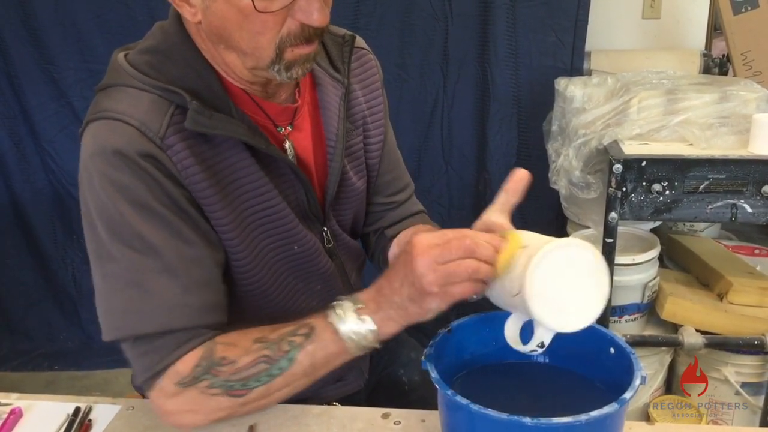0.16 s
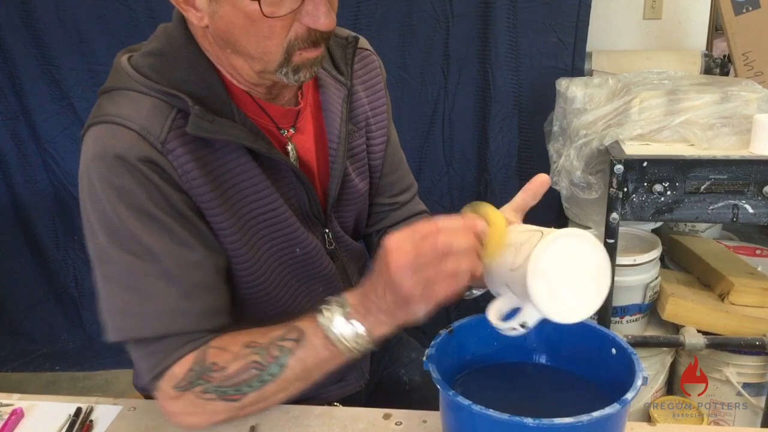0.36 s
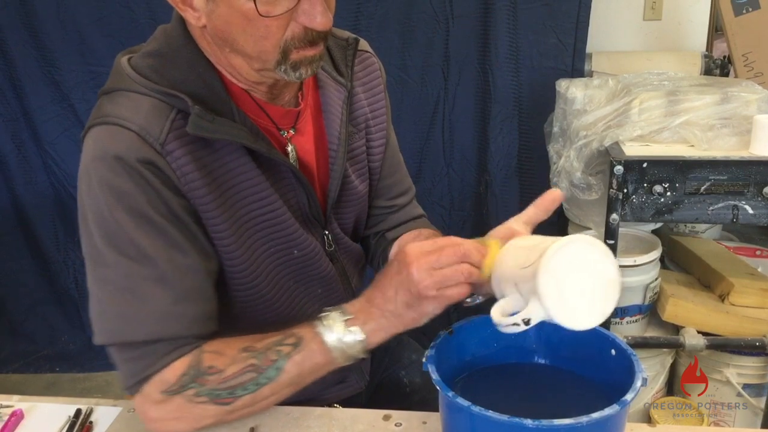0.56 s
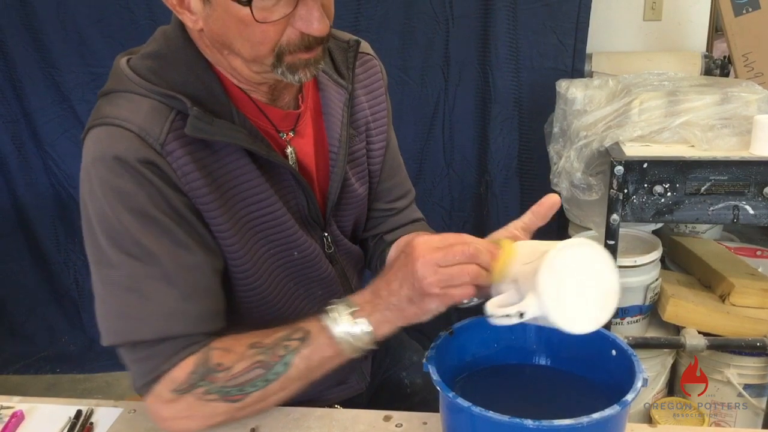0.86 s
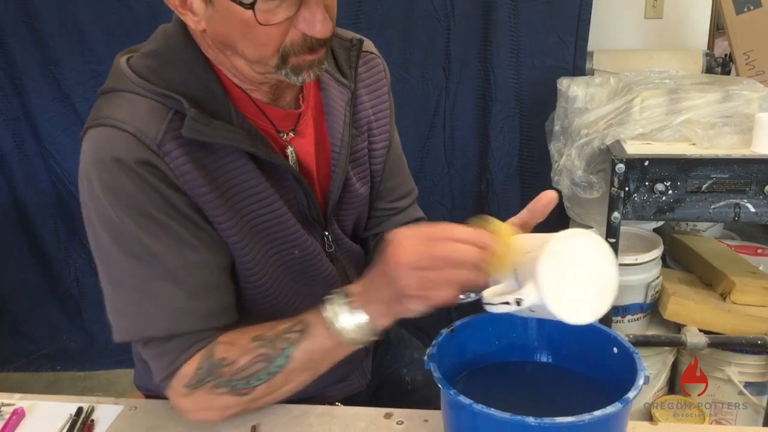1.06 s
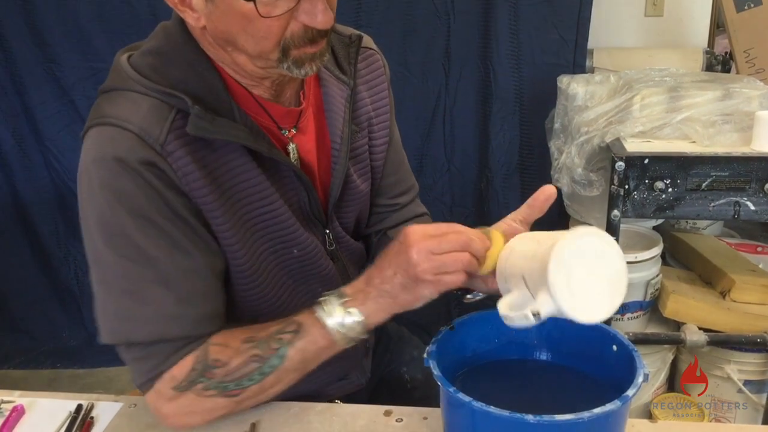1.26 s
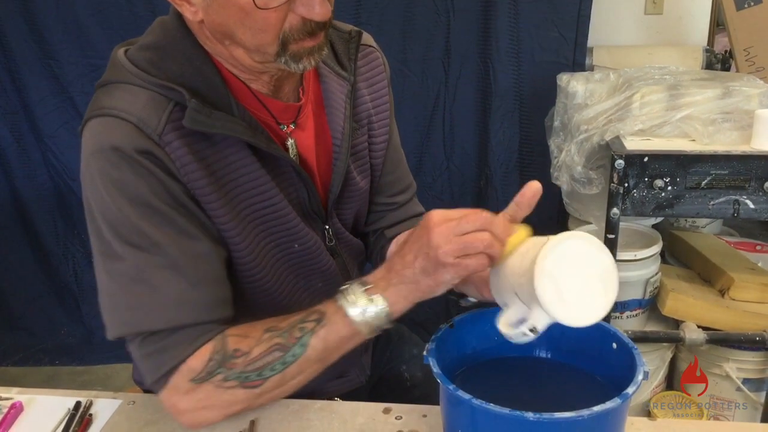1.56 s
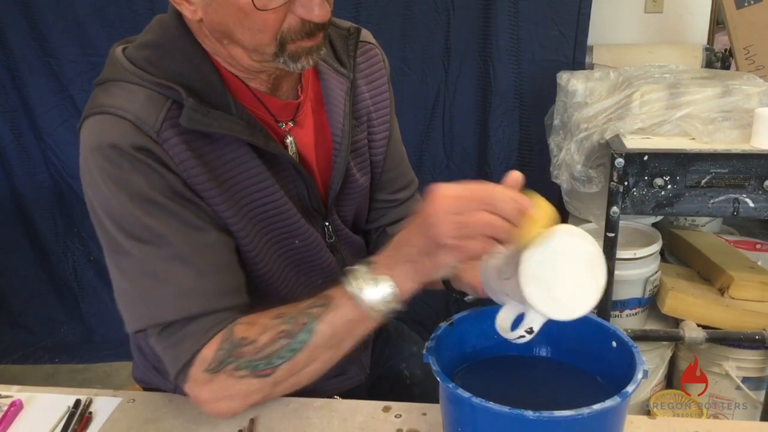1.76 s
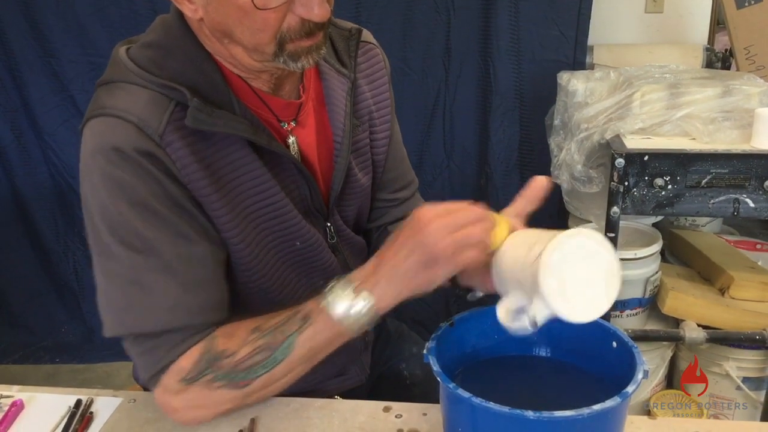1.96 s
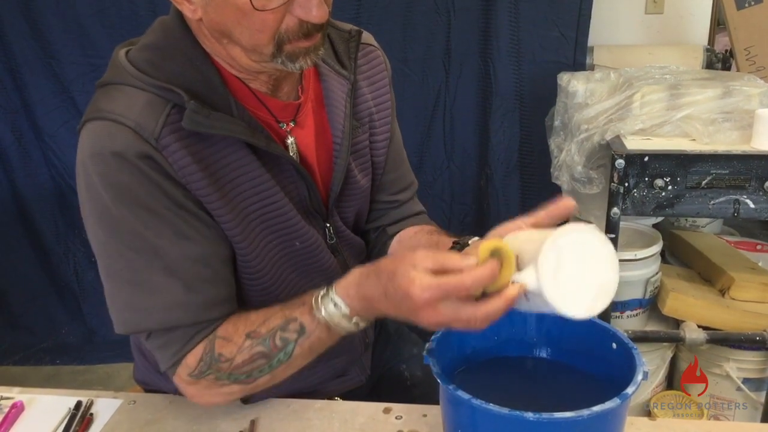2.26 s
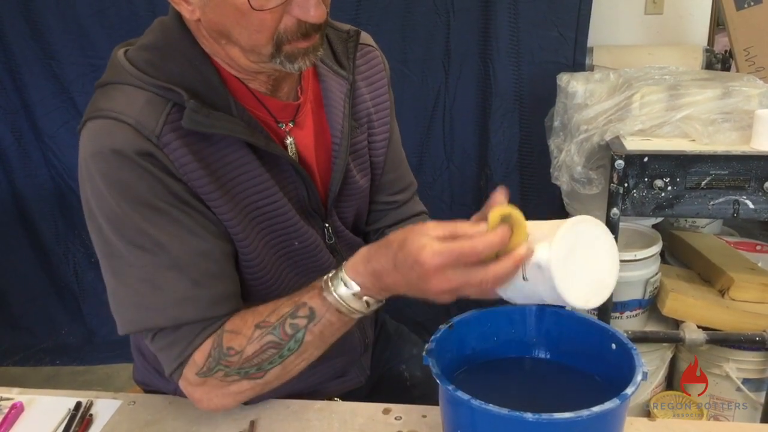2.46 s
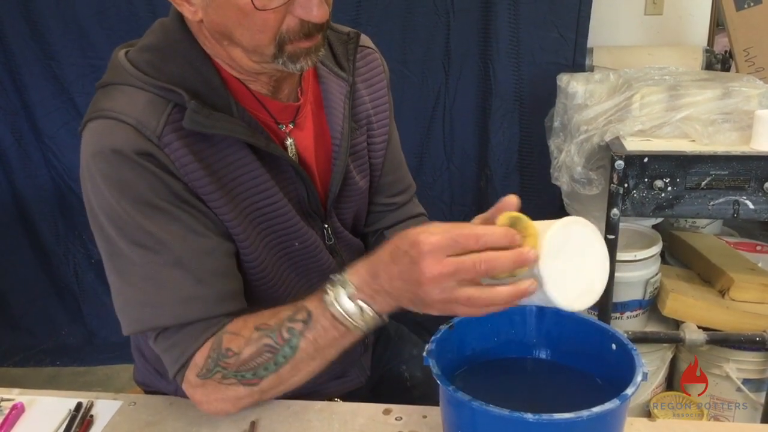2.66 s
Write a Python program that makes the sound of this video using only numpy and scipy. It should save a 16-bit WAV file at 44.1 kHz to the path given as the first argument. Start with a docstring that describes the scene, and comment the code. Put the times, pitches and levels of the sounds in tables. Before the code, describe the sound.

A damp sponge wipes a ceramic mug close to the microphone: six quick, bright, fizzing strokes with small wet ticks, then a longer squeaky rub and a light one, in a quiet small room with low hum.

```python
"""Damp sponge on a ceramic mug

A damp sponge is wiped over a bare mug in a quiet studio, heard close: six quick strokes, a longer and a light one.
Its pores catch and slip as a dense bright fizz that also rings the mug; wet ticks mark touch-downs.
Single mug notes, a thin squeak and soft low plops come through; faint sparse reflections follow.
A low room rumble with hiss and mains hum lies underneath."""
import sys
import numpy as np
from scipy import signal
from scipy.io import wavfile
from scipy.ndimage import uniform_filter1d

SR = 44100
rng = np.random.default_rng(int(sys.argv[2]) if len(sys.argv) > 2 else 0)


def int16_out(signal):
    """Quantize to a 16-bit WAV file."""
    q = np.round(np.clip(np.atleast_2d(signal).T, -1, 1) * 32767)
    wavfile.write(sys.argv[1], SR, q.astype(np.int16))


N = 123479  # length [samples]


def amp(db):
    """Decibels to a linear factor."""
    return 10 ** (np.asarray(db) / 20)


def evened(x):
    """Scale to an rms of one."""
    return x / np.sqrt(np.mean(x ** 2) + 1e-20)


def drift(seconds):
    """Slow random wander: twice-smoothed noise with an rms of one."""
    steps = rng.standard_normal(N // 128 + 2)  # one step per 128 samples
    size = int(seconds * SR / 128) + 1
    smooth = evened(uniform_filter1d(uniform_filter1d(steps, size), size))
    return np.interp(np.arange(N) / 128, np.arange(len(steps)), smooth)


def colour(x, points):
    """Causal minimum-phase filter with the given spectrum shape; white input keeps its power."""
    f, db = np.transpose(points)
    hz = abs(np.fft.fftfreq(4096, 1 / SR))
    log_gain = np.log(amp(np.interp(np.log(hz + 1), np.log(f + 1), db)))
    spectrum = np.exp(np.conj(signal.hilbert(log_gain)))
    taps = np.fft.ifft(spectrum).real[:2048]
    return signal.oaconvolve(x, taps / np.linalg.norm(taps))[:len(x)]


def mode(x, hz, width):
    """One damped resonance; white input keeps its power."""
    r = np.exp(-np.pi * width / SR)
    ringing = signal.lfilter([1], [1, -r * np.exp(2j * np.pi * hz / SR)], x)
    return 2 * np.sqrt(1 - r) * ringing.imag


def steep(x, hz, width):
    """The same resonance twice, for dark valleys between modes."""
    return mode(mode(x, hz, width), hz, width) * np.sqrt(2 * np.pi * width / SR)


# Spectrum of the studio air: (frequency [Hz], relative level [dB per Hz])
AIR_SPECTRUM = [(15, -42), (30, -30), (50, 2), (80, 0.5), (300, -6), (500, -13.5), (900, -18.5),
                (2000, -21), (4000, -23.5), (7500, -29.5), (9000, -24), (13500, -25.5), (14500, -51),
                (15700, -58)]
# Mains hum tones: (pitch [Hz], level before the common lift [dB])
HUM_TONES = [(120, -77), (240, -81.5), (480, -85), (1080, -90.5), (1920, -86)]
AIR_DB = -67  # rms before the rumble wanders
RUMBLE_DRIFT_DB, RUMBLE_DRIFT_S, RUMBLE_TOP_HZ = 3.5, 0.088, 160
HUM_LIFT_DB, HUM_DRIFT_DB, HUM_DRIFT_S = 2.5, 3.0, 0.025


def studio_air():
    """Coloured noise whose rumble wanders in level, with hum tones that waver separately."""
    t = np.arange(N) / SR
    air = amp(AIR_DB) * evened(colour(rng.standard_normal(N), AIR_SPECTRUM))
    rumble = signal.lfilter(*signal.butter(2, RUMBLE_TOP_HZ, fs=SR), air)
    out = air + rumble * (amp(RUMBLE_DRIFT_DB * drift(RUMBLE_DRIFT_S)) - 1)
    for hz, db in HUM_TONES:
        level = amp(db + HUM_LIFT_DB + HUM_DRIFT_DB * drift(HUM_DRIFT_S))
        out += level * np.sin(2 * np.pi * (hz * t + rng.random()))
    return out


ROOM_T60, ROOM_DB = 0.15, -10  # 60 dB decay time [s], level against the direct sound [dB]


def room(x):
    """Sparse reflections of random sign, decaying exponentially."""
    at = np.arange(200, SR // 2, 20)
    at = at + rng.integers(0, 20, len(at))  # one reflection at a random place in every 20 samples
    taps = np.zeros(SR // 2 + 20)
    taps[at] = rng.choice([-1., 1.], len(at)) * amp(-60 * at / SR / ROOM_T60)
    return amp(ROOM_DB) * signal.oaconvolve(x, taps / np.linalg.norm(taps))[:N]


# Soft low plops: (time [s], starting level [dB], pitch [Hz], 60 dB decay time [s])
PLOP_TONES = [(.348, -59, 990, 0.028), (1.364, -62.5, 737, 0.048), (1.367, -57.5, 960, 0.031),
              (2.686, -56, 76.6, 0.16)]


def plops():
    """Short sine tones that die away exponentially."""
    t, out = np.arange(N) / SR, np.zeros(N)
    for start, db, hz, t60 in PLOP_TONES:
        since = np.maximum(t - start, 0)
        out += amp(db - 60 * since / t60) * np.sin(2 * np.pi * hz * since)
    return out


# Thin squeak in the long stroke: (time [s], pitch [Hz], level before the lift [dB])
SQUEAK_PATH = [(2.28, 905, -98), (2.296, 902, -65), (2.35, 911, -72), (2.39, 895, -82), (2.403, 852, -75),
               (2.44, 852, -72), (2.46, 905, -82), (2.485, 913.5, -66), (2.53, 916, -73), (2.57, 910, -94)]
SQUEAK_WIDTH_HZ, SQUEAK_LIFT_DB = 35, 5.5


def squeak():
    """A gliding sine, roughened by slow noise on its amplitude."""
    s, hz, db = np.transpose(SQUEAK_PATH)
    r = np.exp(-np.pi * SQUEAK_WIDTH_HZ / SR)
    slow_noise = signal.lfilter([1], np.convolve([1, -r], [1, -r]), rng.standard_normal(N))
    rough = 1 + 0.3 * evened(slow_noise)
    t = np.arange(N) / SR
    turns = np.cumsum(np.interp(t, s, hz)) / SR
    level = amp(np.interp(t, s, db, -150, -150) + SQUEAK_LIFT_DB)
    return level * rough * np.sin(2 * np.pi * turns)


# Moments when one note of the mug sings up under the sponge:
# (centre time [s], length [s], pitch [Hz], width of each of two resonances [Hz], level at the centre [dB])
HOLLOW_NOTES = [(0.176, 0.058, 601, 64, -59), (0.512, 0.038, 603, 110, -64),
                (0.495, 0.03, 1604, 151, -63.5), (0.841, 0.031, 1652, 140, -60),
                (1.556, 0.061, 607, 100, -63), (1.55, 0.035, 1696, 94, -57.5),
                (1.889, 0.078, 1694, 140, -57.5), (1.89, 0.054, 582, 80, -66),
                (2.301, 0.017, 572, 69, -58.5), (2.3, 0.02, 1570, 130, -59.5),
                (2.37, 0.13, 2040, 49.7, -70), (2.469, 0.037, 1900, 37, -62),
                (2.574, 0.046, 1912, 42, -65.5), (1.21, 0.04, 3260, 83, -58), (1.95, 0.043, 3280, 110, -55),
                (2.325, 0.042, 3370, 80, -60), (2.375, 0.047, 3335, 70, -54),
                (2.462, 0.035, 3320, 77, -50.5), (2.59, 0.03, 3400, 120, -63.5),
                (2.365, 0.054, 4030, 61, -58), (2.425, 0.032, 5870, 70, -54), (2.585, 0.035, 5450, 90, -64)]


def hollow():
    """Noise through a narrow double resonance gives rough notes that swell and fade."""
    t, out = np.arange(N) / SR, np.zeros(N)
    for (centre, length, hz, width, db), noise in zip(HOLLOW_NOTES, rng.standard_normal((len(HOLLOW_NOTES), N))):
        swell = np.exp(-4 * ((t - centre) / length) ** 2)
        note = swell * steep(noise, hz, width)
        out += amp(db) * note * np.linalg.norm(swell) / np.linalg.norm(note)
    return out


SLIPS_PER_S, SLIP_SPREAD_DB = 9000, 2


def slips():
    """Pores catch and let go: dense clicks of random sign and uneven size."""
    draw, size = rng.random(N), rng.exponential(1, N)
    sign = rng.choice([-1., 1.], N)
    return evened(sign * (draw < SLIPS_PER_S / SR) * amp(SLIP_SPREAD_DB * np.minimum(size, 5)))


# Wet ticks, plus a soft bump of the brushing sponge at 0.68 s: (time [s], level before the trim [dB], mug ring
# against the fizz [dB])
WET_TICKS = [(0.0963, -26.5, -10), (0.437, -24.5, -20), (0.6774, -38.5, -23), (0.7739, -28.5, -20),
             (1.0415, -34, -6), (1.056, -43, -10), (1.137, -37, -16), (1.1662, -27, -11), (1.441, -42, 0),
             (1.8077, -29.5, -16.5), (2.693, -52, -15)]
TICK_T60, TICK_RISE_S, TICK_TRIM_DB = 0.02, 0.00022, -14


def add_ticks(firm):
    """Short noise bursts with a quick rise and an exponential fade, added to the firm-grip rows."""
    u = np.arange(1500) / SR
    for (start, db, ring_db), noise in zip(WET_TICKS, rng.standard_normal((len(WET_TICKS), 1500))):
        burst = amp(db + TICK_TRIM_DB - 60 * u / TICK_T60) * np.minimum(u / TICK_RISE_S, 1) * noise
        first = round(start * SR)
        firm[:, first:first + 1500] += amp([[0], [ring_db], [ring_db]]) * burst


# Light brushing between strokes: (time [s], fizz level [dB], low body against the fizz [dB])
LIGHT_BRUSH = [(0, -60, -34), (.05, -72, 3.5), (.3, -67.5, -10), (.42, -59, -9), (.66, -69, -27),
               (.75, -75, -23), (1.0, -75, -12), (1.13, -70, -13), (1.35, -62.5, -6.5), (1.4, -71.5, 4.5),
               (1.47, -70.5, 9), (1.701, -65, -7), (1.8, -78.5, 8), (2.05, -63.5, -20), (2.15, -80.5, -26),
               (2.66, -84, -7), (2.76, -76.5, -11), (2.8, -64, -16)]
# Strokes: (start time [s], touch-down below level [dB], rise [s], hold [s], level [dB],
#           swell over the hold [dB], lift [dB per s], mug ring against the fizz [dB],
#           low body against the fizz [dB], its change over the hold [dB], loose grip [0-1],
#           bite [power of the rise, low = late and sudden], peel-off drop [dB])
WIPES = [(0.123, -16, 0.037, 0.083, -41.5, 3.1, 330, -22.5, -12, -11, 0, 0.85, -3),
         (.462, -17.5, 0.022, 0.11, -40.5, 1.2, 300, -16.5, -15, -16, 0.15, 0.66, -5.5),
         (0.805, -15.5, 0.027, 0.086, -40.5, 1.6, 332, -16.5, -12, -15, 0.092, 0.44, -3),
         (1.164, -25, .026, 0.095, -41, 2, 334, -12, -12, -10.5, 0.081, 0.76, -5),
         (1.485, -20.5, 0.031, 0.11, -43, 3.4, 332, -22, -13, -2, 0.053, 0.86, -3.5),
         (1.817, -22, 0.041, 0.11, -42.5, 2.95, 332, -8, -11.5, -40, 0.07, 0.76, -4),
         (2.271, -28, 0.029, 0.19, -45, 0.56, 300, -11, -12.5, -2, 0.9, 0.92, -1),
         (2.521, -19.5, 0.054, 0.024, -56, 0.5, 294, -5.5, -10, 3, 0.78, 0.97, -0.5)]
SWELL_TURN = 0.79  # the swell follows a sine over this many half turns
PEEL_S = 0.008  # the sponge peels off this fast as the slower lift begins


def contact():
    """Force on the mug: rows of fizz, ring and low body, for the firm grip and then the loose one."""
    t = np.arange(N) / SR
    s, brush_db, brush_body_db = np.transpose(LIGHT_BRUSH)
    force = np.zeros((2, 3, N))
    force[0, 0] = amp(np.interp(t, s, brush_db))
    force[0, 2] = amp(np.interp(t, s, brush_db + brush_body_db))
    for start, touch_db, rise, hold, db, swell_db, lift, ring_db, body_db, body_change_db, grip, bite, peel_db in WIPES:
        along = np.clip((t - start - rise) / hold, 0, 1)
        after = np.maximum(t - start - rise - hold, 0)
        touch = touch_db * np.clip(1 - (t - start) / rise, 0, 1) ** max(bite, .1)
        swell = swell_db * np.sin(np.pi * SWELL_TURN * along)
        release = peel_db * np.minimum(after / PEEL_S, 1) - lift * after
        press = amp(db + touch + swell + release) * (t > start)
        rows = press * np.array([amp(0 * t), amp(ring_db + 0 * t), amp(body_db + body_change_db * along)])
        loose = np.clip(grip, 0, 1)
        force += np.array([1 - loose, loose])[:, None, None] * rows
    force *= slips()
    add_ticks(force[0])
    return force


# Fizz below the treble, one row per stroke: (level at the start of the hold [dB], level at its end [dB])
STROKE_MIDS = [(1.5, -1), (1, 0), (2.5, -4), (1.5, -1), (2, 0), (2.5, -1.5), (-0.5, 1), (0, 2)]
MID_TOP_HZ = 7500


def mid_gain():
    """Gain below the treble: the six quick strokes start fuller or thin out, or both; the last two fill out."""
    times = [s for start, _, rise, hold, *_ in WIPES for s in (start + rise, start + rise + hold)]
    return amp(np.interp(np.arange(N) / SR, times, np.ravel(STROKE_MIDS)))


PATCH_DB = 2.6


def patchy(x):
    """The sponge face changes, so narrow bands swell and dip in streaks."""
    z = signal.stft(x, nperseg=512)[2]
    field = rng.standard_normal(z.T.shape).T
    field = uniform_filter1d(field, size=3, axis=0)  # across frequency
    field = evened(uniform_filter1d(field, size=7, axis=1))  # along time
    return signal.istft(z * amp(PATCH_DB * field), nperseg=512)[1][:N]


# Fizz colour: (frequency [Hz], on the wall [dB per Hz], on the foot of the loosely held mug [dB per Hz])
FIZZ_COLOUR = [(285, -40, -53), (640, -45, -67), (1170, -28, -35), (1580, -22, -16.5), (3290, -9.5, -25),
               (4110, -9.5, -14), (4280, -13.5, -34), (4760, -11, -36), (5070, -5, -11), (7130, -6, -7),
               (7790, -9, -20.5), (8100, -0.5, -4), (9050, 5.5, 2), (10200, -0.5, -3), (11530, 2.5, -3),
               (13900, -3.5, -11), (14640, -12, -22), (15240, -20, -39)]
# Mug modes: (pitch [Hz])
MODE_HZ = [598, 1550, 1700, 1910, 2050, 2434, 3034, 3334, 3530, 4030, 4975, 5111, 5365, 5872, 6731, 7345]
# The same modes in order: (width before the firm grip widens it [Hz], firmly held [dB], loosely held [dB])
MUG_MODES = [(39.2, -37, -17.5), (92, -40, -15), (59.5, -17, -29), (49.3, -11, -18), (48, -19.5, -15.5),
             (51, -15.5, -11), (49, -25, -7.5), (50, -15, -1), (49.7, -40, -9.5), (89, -20, -11.5),
             (49.3, -12, -17), (51, -28, -12), (88, -38, -9), (48.7, -11, -7), (90.5, -11.5, -15.5),
             (82, -28, -8)]
HELD_WIDEN, BODY_HZ = 2.2, 2100  # width factor in the firm grip; modes below BODY_HZ are the low body
MODE_DRIFT_DB, MODE_DRIFT_S = 3.0, .025


def sponge():
    """Bright fizz plus the ringing mug; each mode swells and fades as the sponge travels."""
    held, loose = contact()
    hz, wall_db, foot_db = np.transpose(FIZZ_COLOUR)
    fizz = colour(held[0], np.c_[hz, wall_db]) + colour(loose[0], np.c_[hz, foot_db])
    mids = signal.filtfilt(*signal.butter(4, MID_TOP_HZ, fs=SR), fizz)
    out = patchy(fizz + mids * (mid_gain() - 1))
    for hz, (width, held_db, loose_db) in zip(MODE_HZ, MUG_MODES):
        row = 1 + (hz < BODY_HZ)  # 1 ring, 2 low body
        reach = amp(MODE_DRIFT_DB * drift(MODE_DRIFT_S))
        out += mode(amp(held_db) * reach * held[row], hz, width * HELD_WIDEN)
        out += steep(amp(loose_db) * reach * loose[row], hz, width)
    return out


def scene():
    """The close sounds with their reflections, over the studio air."""
    near = plops() + squeak() + hollow() + sponge()
    return (studio_air() + room(near) + near)[None]


EDGE_HZ = 15730


def record(dry):
    """The microphone side: a steep low-pass limits the band."""
    taps = signal.firwin(511, EDGE_HZ, window=("kaiser", 9), fs=SR)
    return signal.oaconvolve(dry, taps[None], "same")


dry = scene()
out = record(dry)
int16_out(out)
```